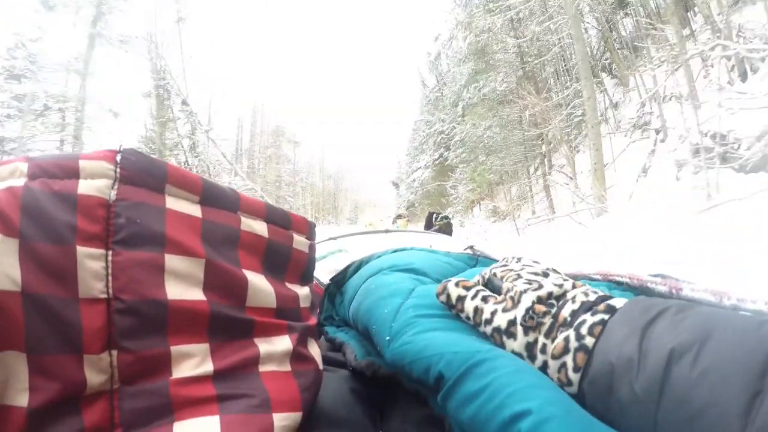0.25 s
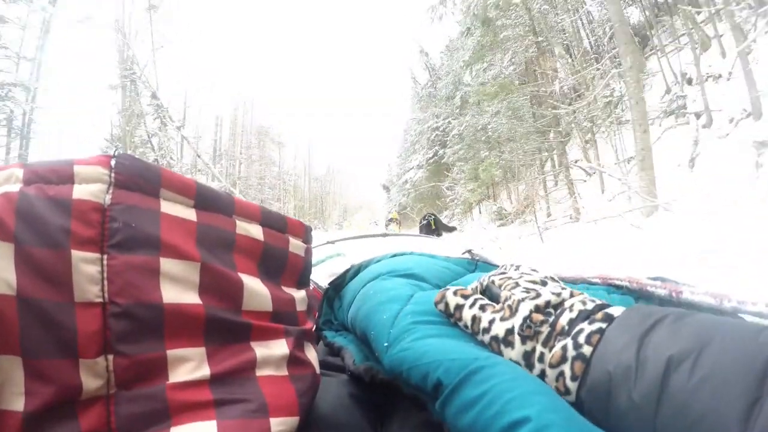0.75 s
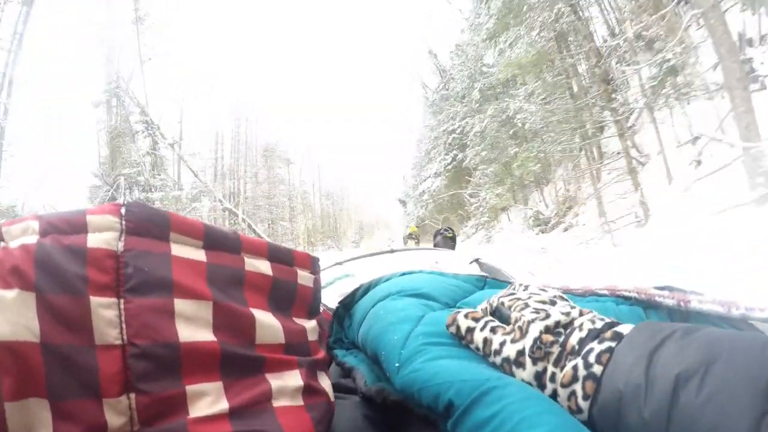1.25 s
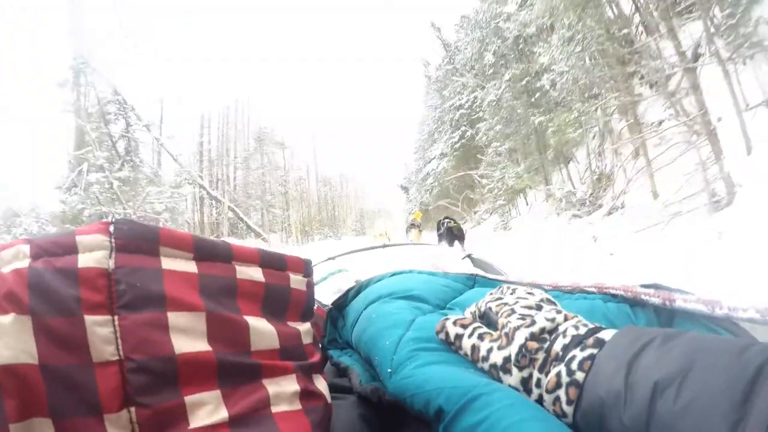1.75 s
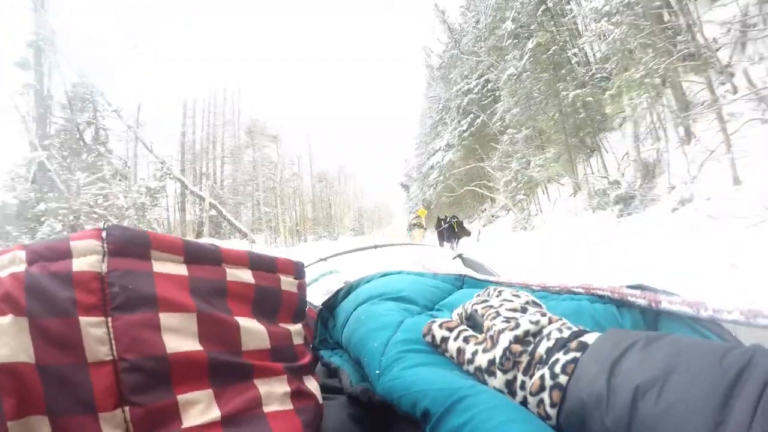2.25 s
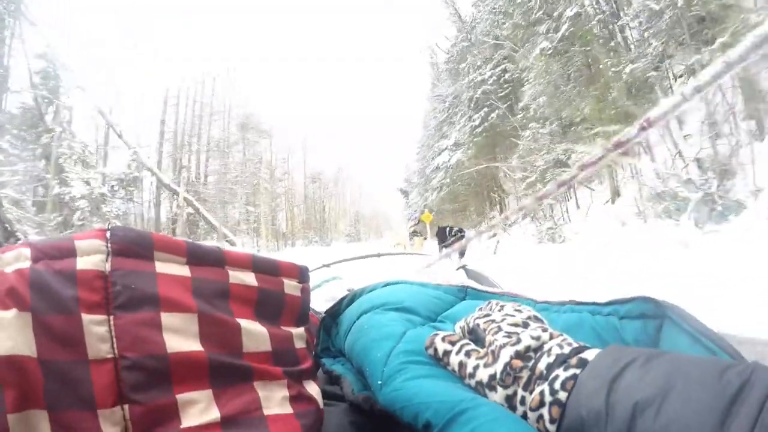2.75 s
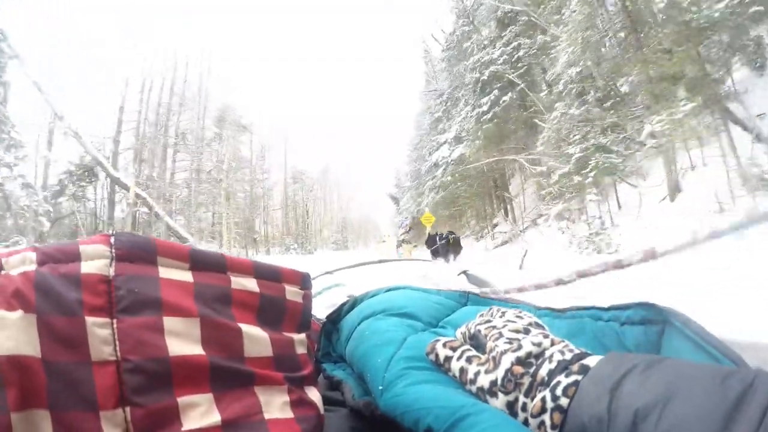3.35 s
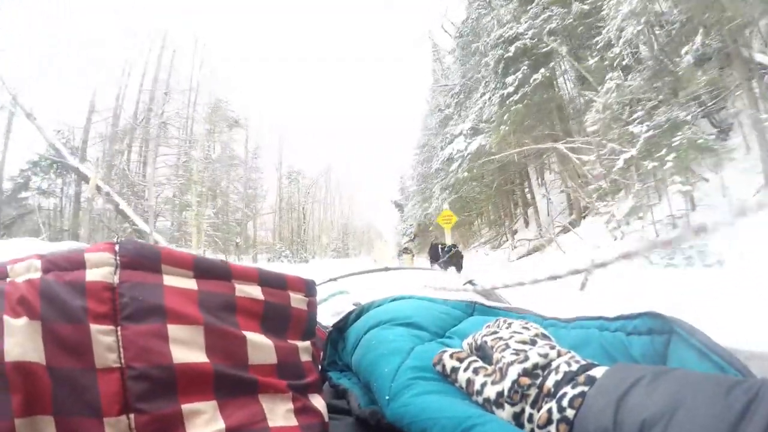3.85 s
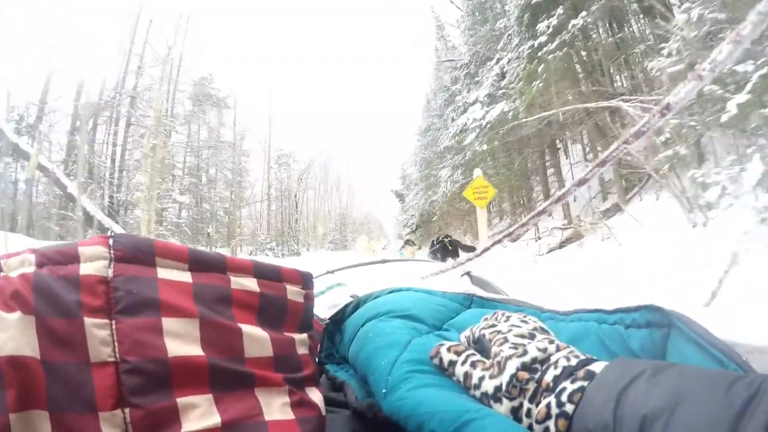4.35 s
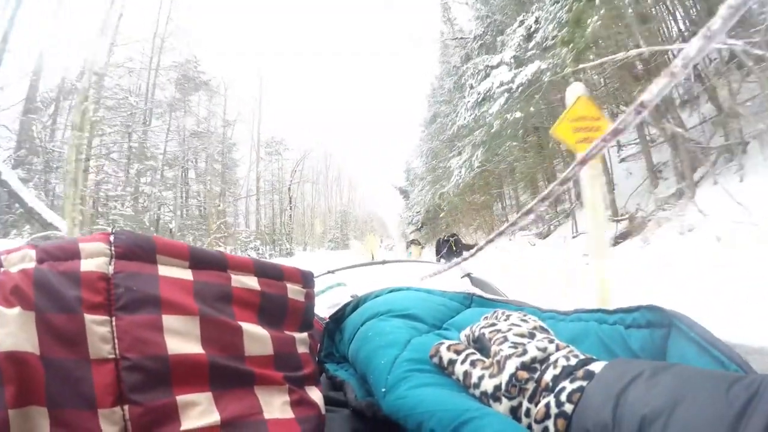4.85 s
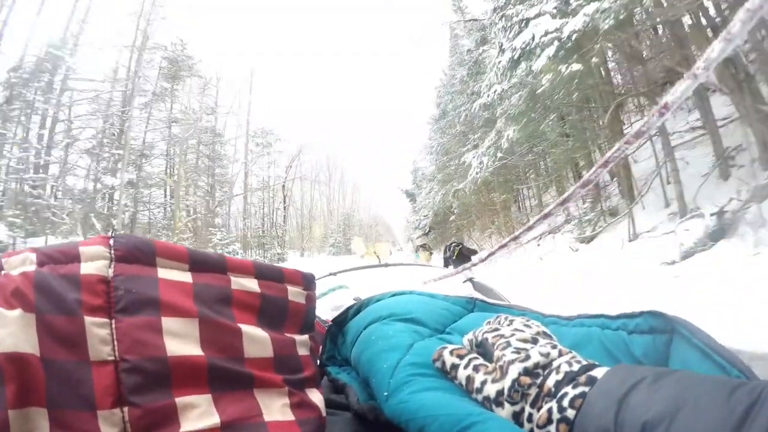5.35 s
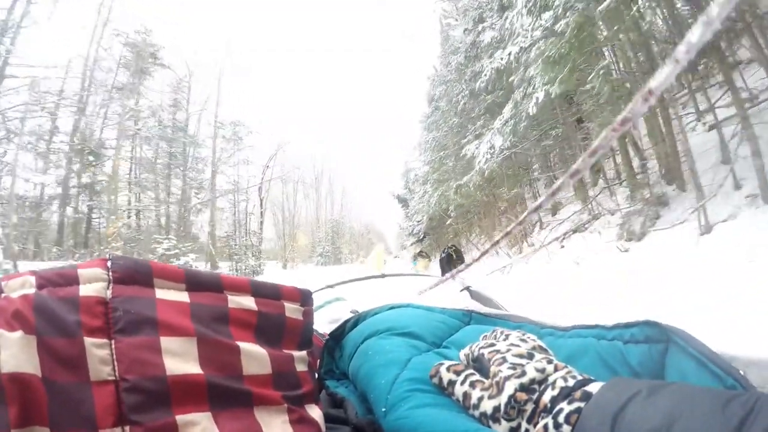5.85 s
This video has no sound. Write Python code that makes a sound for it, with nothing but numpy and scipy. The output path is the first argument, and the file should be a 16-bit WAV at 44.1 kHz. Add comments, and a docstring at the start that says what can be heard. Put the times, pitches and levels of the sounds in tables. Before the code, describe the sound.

Heard close up from inside a moving sled, a continuous low rumble and throbbing hum mix with the hiss of runners on snow. The ride starts rough and crunchy, then smooths out after a second or so. Bumps knock the wooden frame at irregular moments, small bright ticks come from buckles and ice, and head wind thumps on the microphone in quick puffs.

```python
"""A dog sled glides over crusty, then packed snow, heard by a small cased camera in its basket.
The runners shake the wooden frame and basket, and stick-slip friction keeps the bed droning on one low mode.
Snow crunches and hisses under the runners, and the hiss excites the cavities of the camera case.
Head wind buffets the microphone, ridges knock the frame, buckles and ice chips tick, and a strap squeaks."""
import sys
import numpy as np
from scipy import signal
from scipy.fft import rfft, irfft
from scipy.io import wavfile
from scipy.ndimage import uniform_filter1d

SR = 44100
rng = np.random.default_rng(int(sys.argv[2]) if len(sys.argv) > 2 else 0)


def generate_wav(sig):
    """Save sig (samples, or channels by samples) to the path in sys.argv[1] as 16-bit PCM at SR."""
    pcm = np.round(np.clip(np.atleast_2d(sig).T, -1, 1) * 32767).astype(np.int16)
    wavfile.write(sys.argv[1], SR, pcm)


N = 268569
LEAD = 512  # samples of a burst ahead of its contact
# cavity resonances of the camera case: centre_hz, width_hz, gain_db
CASE = [(4670, 170, -2.5), (6260, 540, -5)]
# first contact against the rattle after it: thud_ratio, knock_ratio, crack_ratio, tick_ratio
CONTACTS = 18, 25, 7, 5


def undb(db):
    """Amplitude ratio of a level in dB."""
    return 10 ** (np.asarray(db) / 20)


def unit(x):
    """Normalisation to rms 1."""
    return x / np.sqrt(np.mean(x ** 2))


def colour(x, spectrum):
    """Spectral shaping by (freq_hz, gain_db) points, at rms 1."""
    hz, db = np.transpose(spectrum)
    bins_hz = np.maximum(np.fft.rfftfreq(N, 1 / SR), 1)
    gain_db = np.interp(np.log(bins_hz), np.log(hz), db, left=-90, right=-90)
    return unit(irfft(rfft(x) * undb(gain_db), N))


def ring(x, modes):
    """Forced response of parallel resonators (centre_hz, width_hz, gain_db)."""
    return sum(undb(db) * signal.lfilter(*signal.iirpeak(hz, hz / width, SR), x) for hz, width, db in modes)


def walk(rate_hz):
    """Random modulation: held steps, smoothed twice, at rms 1."""
    hold = int(SR / rate_hz)
    steps = np.repeat(rng.standard_normal(2000), hold)[:N]
    return unit(uniform_filter1d(uniform_filter1d(steps, hold), hold))


def curve(table):
    """Linear interpolation of (time_s, value) rows."""
    return np.interp(np.arange(N) / SR, *np.transpose(table))


def swells(table, sigma_s):
    """Superposed Gaussian bells at (time_s, swell_db, ...) rows, one curve per level column."""
    t = np.arange(0, N + 64, 64) / SR
    times_s, *columns = np.transpose(table)
    bells = np.exp(-.5 * ((t[:, None] - times_s) / sigma_s) ** 2)
    return [np.interp(np.arange(N) / SR, t, bells @ column) for column in columns]


def grains(share, spread_db):
    """Brittle fracture of snow crystals: noise with sparse spikes, sizes spread exponentially in dB."""
    breaks = rng.random(N) < share
    noise = rng.standard_normal(N)
    size_db = spread_db * np.minimum(rng.exponential(size=N), 3)
    return noise * (1 + breaks * undb(size_db))


def burst(decay_s, contact, rise_s=0.0032):
    """Impact cushioned by snow: noise swells to an impulse, then dies 60 dB in decay_s."""
    t = (np.arange(8192) - LEAD) / SR
    force = rng.standard_normal(len(t)) + contact * (np.abs(t) < 1 / SR)
    rise = np.clip(1 + t / rise_s, 0, 1) ** 2
    return force * rise * undb(-60 * np.maximum(t, 0) / decay_s)


def add(out, blow, contact_s):
    """Superposition of a blow with its contact at contact_s."""
    start = int(contact_s * SR) - LEAD
    out[start:start + len(blow)] += blow[:N - start]


def muffle(x, cutoff_hz=6900):
    """Transmission loss: the camera case takes the treble off a blow."""
    return signal.sosfilt(signal.butter(6, cutoff_hz, fs=SR, output="sos"), x)


def basket_shudder(rough_db, jolt_db):
    """Forced vibration: rough snow and humps shake the basket in a low band."""
    # response of the basket: freq_hz, gain_db
    spectrum = [(70, -25), (105, -5), (150, -2), (175, -3.5), (210, -14)]
    return colour(rng.standard_normal(N), spectrum) * undb(-22.5 + 0.96 * rough_db + jolt_db)


def frame_rumble(rough_db, jolt_db, chatter):
    """Random excitation: the chattering runners drive the wooden frame."""
    # response of the frame: freq_hz, gain_db
    spectrum = [(190, -19.5), (235, 3.5), (270, -2.5), (340, -5.5), (440, -9.5), (540, -17.5), (610, -16.5),
                (700, -32.5), (900, -47)]
    force = rng.standard_normal(N) * undb(1.7 * chatter + 1.1 * walk(60))
    return colour(force, spectrum) * undb(-26.5 + rough_db + jolt_db)


def snow_grind(rough_db, jolt_db, chatter):
    """Granular fracture: rougher crust breaks into more grains and darkens the crunch."""
    # spectrum of crushed snow: freq_hz, gain_db
    spectrum = [(500, -28.5), (700, -1), (880, -1), (1000, -6), (1400, -10.5), (2000, -14), (3000, -19),
                (3600, -38)]
    # bands that grow on crust: centre_hz, width_hz, gain_db
    crust_bands = [(900, 63, 7), (1110, 340, 2), (1390, 200, -7.5)]
    crystals = grains(0.0011 * undb(0.71 * rough_db), spread_db=8.2)
    crunch = colour(crystals * undb(chatter + 1.2 * walk(57)), spectrum)
    crust = (undb(0.44 * rough_db) - 1) * ring(crunch, crust_bands)
    return (crunch + crust) * undb(-45 + 0.29 * rough_db + jolt_db)


def snow_hiss(level_db, rough_db, chatter):
    """Friction noise with cavity resonance: the case's upper mode rings more on rough snow."""
    # spectrum of sliding on snow: freq_hz, gain_db
    spectrum = [(2600, -22.5), (3300, -10), (4000, -3.5), (5300, -6.5), (6800, -7), (7400, -17),
                (9500, -19), (11500, -36.5), (13000, -31.5), (15200, -43)]
    # strength of the lower cavity's ring: time_s, gain_db
    lower_ring = [(0.02, -2), (0.5, -3), (1.0, -2.5), (1.6, -0.5), (2.0, -2), (2.12, 4), (2.27, 5.5),
                  (2.34, -0.5), (2.46, 3), (2.55, -5), (2.72, -2), (2.8, 3), (2.95, 2.5), (3.1, -6),
                  (3.33, -1.5), (3.45, 7), (3.55, 0.5), (3.72, 1), (3.8, 1), (3.92, 2), (4.05, 2),
                  (4.5, 4.5), (4.65, -2.5), (4.75, 2), (5.0, 2), (5.4, 1), (5.85, 2.5), (6.07, -2)]
    friction = grains(0.013, spread_db=6.2) * undb(0.74 * chatter + 0.32 * walk(22))
    drives_db = curve(lower_ring), 0.2 * rough_db
    cavities = sum(ring(friction, [mode]) * undb(1.3 * walk(7.5) + db) for mode, db in zip(CASE, drives_db))
    return colour(friction + undb(4) * cavities, spectrum) * undb(level_db)


def powder_spray(hiss_db):
    """Modulated noise: fine powder adds a faint treble that partly follows the hiss level."""
    # spectrum of the powder: freq_hz, gain_db
    spectrum = [(7000, -21), (8000, -2), (10000, -0.5), (12500, -11.5), (15200, -19.5)]
    powder = rng.standard_normal(N) * undb(1.2 * walk(19))
    return colour(powder, spectrum) * undb(-64.5 + 0.4 * (hiss_db - np.mean(hiss_db)))


def runners(rough_db):
    """Common excitation: humps jolt the sled, and one chatter modulates rumble, grind and hiss."""
    # jolts from humps: time_s, frame_db, grind_db, basket_db
    humps = [(0.12, 2, 7.5, -9), (0.18, -1, 0.5, -7), (0.35, -11, -1, 0.5), (0.51, 3, 6.5, 4),
             (0.6, -4, 4.5, 0.5), (0.72, -6, -4, 4), (0.9, 1, 4, -2), (0.98, 3, 5, 3.5), (1.05, 3, 3.5, -3),
             (1.16, 1.5, 2, -1.5), (1.27, 5, 6.5, 1), (1.835, 3, 5, 8.5), (2.28, 3.5, 2.5, 9.5),
             (2.55, 8, 6, 7.5), (2.8, 6.5, 1, 12), (2.94, 1.5, -9, 6), (3.08, 2, -4, 8),
             (3.49, 13, 4.5, -5), (3.88, 11, 3.5, 5.5), (4.16, -11, 2, 10.5), (4.25, 7.5, 3.5, 8.5),
             (4.43, 7, 0, 10), (4.72, 10.5, 3, 4), (4.76, 7, 1, 7), (5.225, 5.5, 5.5, 11),
             (5.42, 8, 6.5, 6.5), (5.86, 6, 7, 1.5), (5.96, -8, 0.5, 12.5)]
    # hiss of the glide: time_s, level_db
    glide = [(0.02, -49), (0.25, -48), (0.75, -49), (1.08, -46.5), (1.39, -48.5), (1.82, -47), (2.3, -48.5),
             (2.57, -50), (3.22, -49), (3.47, -48.5), (4.23, -47.5), (4.53, -50.5), (4.73, -48.5),
             (5.17, -48.5), (5.3, -46), (5.68, -48), (6.0, -46)]
    # harder patches that swell the hiss: time_s, swell_db
    scrapes = [(0.25, 1.5), (0.62, -1), (1.27, 5), (1.95, 2), (2.25, 1.5), (2.52, 2.5), (2.82, 3),
               (2.92, 4), (3.07, 2), (3.24, 3.5), (3.39, 2), (3.47, 1.5), (3.72, 2.5), (3.88, 2), (4.08, 2),
               (4.29, 4.5), (4.42, 2), (4.74, 2), (5.11, 3), (5.19, 6), (5.24, 3.5), (5.5, 0), (5.85, 4)]
    frame_db, grind_db, basket_db = swells(humps, sigma_s=0.0096)
    hiss_db = curve(glide) + swells(scrapes, sigma_s=0.015)[0]
    chatter = walk(30)
    wood = basket_shudder(rough_db, basket_db) + frame_rumble(rough_db, frame_db, chatter)
    snow = snow_grind(rough_db, grind_db, chatter) + snow_hiss(hiss_db, rough_db, chatter)
    return wood + snow + powder_spray(hiss_db)


def bed_drone(rough_db):
    """Self-excited vibration: stick-slip sustains the bed's mode; loose slats blur it when weak or jolted."""
    # strength of the drone: time_s, level_db
    levels = [(0.01, -18), (0.02, -14), (0.11, -8.5), (0.14, -19), (0.18, -13), (0.23, -27), (0.3, -16.5),
              (0.38, -21.5), (0.42, -7), (0.45, -29), (0.52, -11.5), (0.6, -15), (0.66, -17), (0.73, -10.5),
              (0.78, -16.5), (0.83, -12), (0.87, -20.5), (0.9, -11.5), (0.97, -19), (1.02, -9), (1.09, -21),
              (1.28, -16), (1.29, -26.5), (1.65, -29.5), (1.7, -16), (1.8, -31.5), (1.85, -15.5),
              (2.02, -23.5), (2.12, -16.5), (2.16, -28.5), (2.17, -20), (2.33, -20.5), (2.41, -23),
              (2.43, -17), (2.49, -32), (2.58, -16.5), (2.63, -33.5), (2.66, -16), (2.71, -27),
              (2.8, -17.5), (2.88, -29), (2.98, -19.5), (3.3, -24), (3.32, -15), (3.41, -26), (3.46, -8.5),
              (3.49, -25), (3.58, -10.5), (3.62, -19.5), (3.67, -13.5), (3.74, -17.5), (3.83, -11.5),
              (3.91, -17.5), (3.98, -16), (4.02, -21), (4.045, -10.5), (4.085, -10), (4.11, -21),
              (4.21, -13), (4.24, -19.5), (4.255, -8.5), (4.28, -7.5), (4.3, -18), (4.34, -11.5),
              (4.39, -14.5), (4.46, -12.5), (4.5, -14.5), (4.56, -11.5), (4.64, -24), (4.74, -14),
              (4.9, -26), (4.93, -13.5), (4.97, -21), (5.01, -15.5), (5.06, -19.5), (5.11, -10.5),
              (5.17, -21), (5.23, -17.5), (5.28, -23), (5.42, -18.5), (5.52, -25), (5.62, -15.5),
              (5.68, -24), (5.82, -18), (5.87, -23), (5.92, -17.5), (6.03, -32), (6.08, -16.5)]
    # band of the loose slats: centre_hz, width_hz, gain_db
    slat_band = [(199.6, 57.3, 18)]
    mode_hz, sag_hz_per_db = 203.5, 0.91  # rough snow loads the bed and lowers its pitch
    lock_db = -17.5  # on smooth snow, a drone above this level holds its pitch best
    level_db = curve(levels)
    looseness = np.clip((lock_db - level_db) / 6.076 + rough_db / 8.04, .1, 1)
    pitch_hz = mode_hz - sag_hz_per_db * rough_db + 9.14 * looseness * walk(14)
    throb_db = 1.4 * walk(20)
    phase = 2 * np.pi * np.cumsum(pitch_hz * (1 + 0.01978 * walk(25))) / SR
    tone = (np.sin(phase) + undb(-25) * np.sin(2 * phase)) * undb(1.3 * walk(35))
    slats = ring(ring(rng.standard_normal(N), slat_band), slat_band)
    slats = signal.sosfilt(signal.butter(2, 400, fs=SR, output="sos"), slats)
    drone = unit(undb(-7 * looseness) * unit(tone) + undb(-3 + 3.3 * looseness) * unit(slats))
    power = uniform_filter1d(drone ** 2, size=1300) + .05
    self_limit = 0.53  # stick-slip evens out the swing (0-1)
    return unit(drone / power ** (self_limit / 2)) * undb(level_db + throb_db)


def head_wind():
    """Turbulent pressure: eddies press on the microphone port in quick puffs."""
    # spectrum of the eddies: freq_hz, gain_db
    spectrum = [(8, -12.5), (25, -5.5), (60, 0.5), (95, 0), (130, -19)]
    # gusts above the steady breeze: time_s, swell_db
    gusts = [(0.18, 7.5), (0.38, 8.5), (0.62, 7), (0.82, 2.5), (1.73, 6.5), (2.0, 12), (2.1, 4.5),
             (2.38, 14.5), (2.64, 5), (2.85, 5), (2.99, 5), (3.49, 12), (3.88, 6.5), (4.42, 7.5), (4.75, 6),
             (5.22, 2), (5.4, 2.5), (5.56, 7), (5.7, 6.5), (6.03, 9)]
    eddies = rng.standard_normal(N) * undb(1.3 * walk(12))
    return colour(eddies, spectrum) * undb(-25.5 + swells(gusts, sigma_s=0.042)[0])


def ridge_knocks():
    """Impact excitation of damped modes: each ridge gives a thud, a woody knock and a crack of ice."""
    # blows on the frame: contact_s, knock_db, thud_db, crack_re_knock_db
    blows = [(0.0934, -41, -27, -11), (0.2, -35, -28, -13), (0.5929, -33, -25, -20),
             (0.636, -31.5, -30, -10), (0.77, -38.5, -29, -8), (0.9, -32, -30, -16),
             (1.003, -30.5, -28, -14), (1.029, -32, -28, -20), (1.058, -31, -27, -16),
             (1.1876, -37, -27, -6.5), (1.483, -39, -25.5, -10), (1.8252, -22, -22, -28),
             (1.832, -26.5, -26.5, -25), (1.842, -25.5, -34, -22), (1.872, -29.5, -34, -13),
             (1.879, -34, -38, -12), (1.955, -32, -17.5, 10.5), (2.093, -47.5, -34.5, -5),
             (2.3415, -49, -28, -12.5), (2.5115, -42, -26.5, -11), (2.9193, -34, -30, -8),
             (2.944, -35, -28, -1), (3.0754, -34.5, -27, -9), (3.4419, -35.5, -28, -1),
             (3.4753, -36, -21.5, -4), (3.541, -49, -34, -12), (3.558, -42.5, -26, -2),
             (3.7092, -41, -23, 10.5), (3.784, -39.5, -34, -15.5), (3.8314, -39, -24.5, -3),
             (3.882, -39.5, -25, -9.5), (4.356, -36.5, -21, -6.5), (4.4, -43.5, -29, -13),
             (4.422, -38.5, -23, -2), (4.4928, -43, -34, -12.5), (4.7087, -35, -28.5, 7),
             (5.12, -50, -23.5, -3.5), (5.182, -32, -31.5, 4), (5.2147, -32, -25, -3.5),
             (5.236, -37, -29, 3), (5.484, -36, -31, -17), (5.7119, -40, -31, -9), (5.9018, -40, -21, -5)]
    # resonances, one list each for thud, knock and crack: centre_hz, width_hz, gain_db
    mode_sets = [(450, 160, 0), (600, 200, -3)], [(890, 220, -1), (1250, 260, 0), (2030, 220, -5),
                 (2500, 250, -12)], [(2800, 2500, -4), (4800, 2600, 0)]
    decays_s = 0.075, 0.045, 0.026
    out = np.zeros(N)
    for contact_s, knock_db, thud_db, crack_re_knock_db in blows:
        peaks_db = thud_db, knock_db, knock_db + crack_re_knock_db
        for modes, decay_s, contact, peak_db in zip(mode_sets, decays_s, CONTACTS, peaks_db):
            response = ring(ring(burst(decay_s, contact), modes), modes)
            add(out, peak(response, peak_db), contact_s)
    return muffle(out)


def peak(x, db):
    """Normalisation to a peak level."""
    return x * undb(db) / np.max(np.abs(x))


def buckle_ticks():
    """Impulse response: buckles and ice chips click in a bright band and excite the case cavities."""
    # small impacts: contact_s, peak_db, centre_hz, case_re_peak_db
    impacts = [(2.2183, -47.5, 8600, 9), (2.2683, -46, 8430, 12.5), (2.4553, -49, 8600, 11.5),
               (2.862, -56, 14000, -10), (2.871, -57.5, 14500, -8), (2.88, -47, 13500, -5.5),
               (3.2231, -48, 9260, 10.5), (3.3238, -51.5, 8060, 13), (3.4507, -39, 12500, 2),
               (3.4564, -45, 9370, 2.5), (3.6441, -41, 9500, 3), (3.6534, -49.5, 9430, 2.5),
               (4.0657, -46.5, 8300, 5.5), (4.6145, -41.5, 9290, 12.5), (5.962, -49.5, 12000, -7.5),
               (6.0144, -42, 10400, -11), (6.0247, -36, 11000, 6.5), (6.029, -38, 12600, 1),
               (6.032, -42, 8540, -3)]
    width_hz = 2700
    out = np.zeros(N)
    for contact_s, peak_db, centre_hz, case_re_peak_db in impacts:
        click = burst(decay_s=0.039, contact=CONTACTS[-1])
        band = [(centre_hz, width_hz, 0)]
        bright = ring(ring(ring(click, band), band), band)
        cavities = muffle(ring(click, CASE))
        add(out, peak(bright, peak_db) + peak(cavities, peak_db + case_re_peak_db), contact_s)
    return out


def strap_squeak(centre_s=2.528, length_s=0.028, pitch_hz=6080, level_db=-45):
    """Tone burst: a strap squeaks once, a thin sinusoid under a flat-topped envelope."""
    t = np.arange(N) / SR - centre_s
    envelope = np.exp(-(2 * t / length_s) ** 4)
    return undb(level_db) * np.sin(2 * np.pi * pitch_hz * t) * envelope


def scene():
    """Superposition of sled, wind and small blows at one microphone."""
    # roughness against smooth snow, crust first and then packed snow: time_s, rough_db
    trail = [(0.02, 9.5), (0.2, 9), (0.38, 4.5), (0.55, 10), (0.78, 8), (1.05, 10), (1.27, 7.5),
             (1.35, 3.5), (1.6, -3), (1.8, 1.5), (2.13, -0.5), (2.35, 1.5), (2.65, -2.5), (2.9, 1),
             (3.2, -2), (3.45, 1), (4.4, 0.5), (4.62, -0.5), (5.2, 2.5), (5.7, 0), (6.07, 0.5)]
    rough_db = curve(trail)
    sled = runners(rough_db) + bed_drone(rough_db)
    return (sled + head_wind() + ridge_knocks() + buckle_ticks() + strap_squeak())[None]


def record(dry):
    """Soft saturation and band limiting: the camera rounds the loudest peaks and cuts the top."""
    ceiling, top_hz = 0.84, 15300
    soft = dry / (1 + (dry / ceiling) ** 8) ** .125
    return signal.sosfilt(signal.ellip(8, .2, 70, top_hz, fs=SR, output="sos"), soft)


dry = scene()
out = record(dry)
generate_wav(out)
```